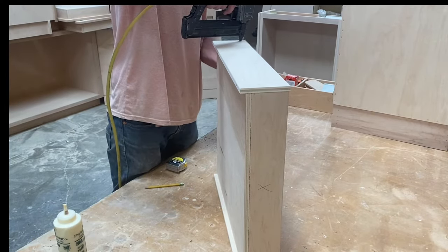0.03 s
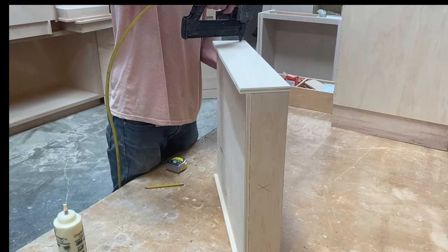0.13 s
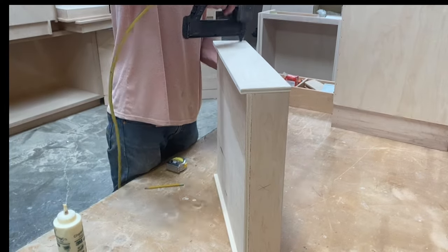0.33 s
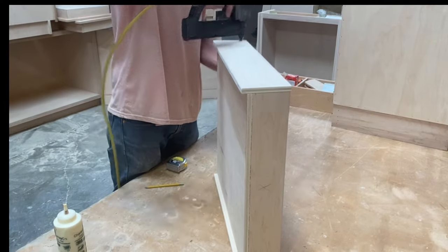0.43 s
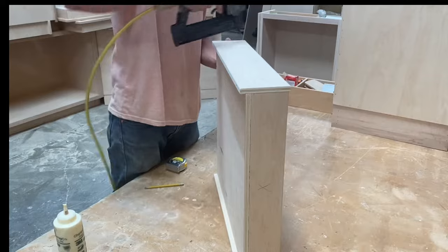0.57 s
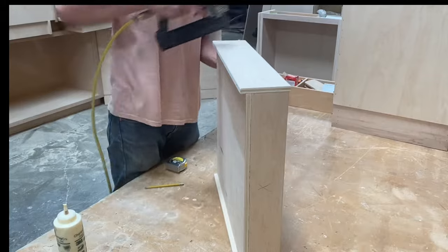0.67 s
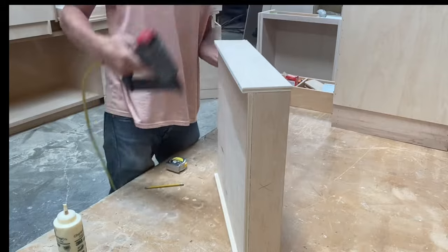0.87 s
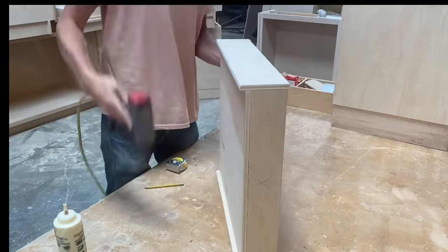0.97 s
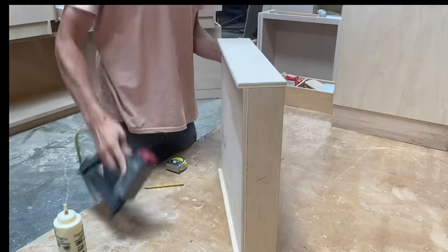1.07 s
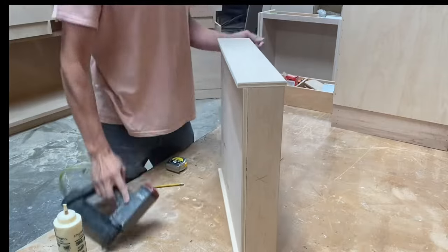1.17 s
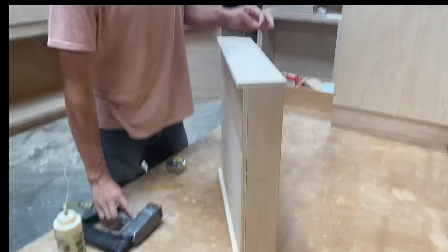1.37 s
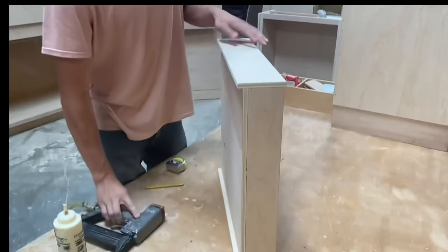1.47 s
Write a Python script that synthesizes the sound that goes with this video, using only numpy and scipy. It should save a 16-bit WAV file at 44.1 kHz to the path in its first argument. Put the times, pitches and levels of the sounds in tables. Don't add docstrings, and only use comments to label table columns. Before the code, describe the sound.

A single sharp nail gun shot with a snappy burst of compressed air, close and slightly squashed by a phone microphone, echoes through the shop; a hose softly brushes the bench and the tool lands with quiet knocks.

```python
import sys
import numpy as np
from scipy import signal
from scipy.fft import rfft, irfft
from scipy.io import wavfile
from scipy.ndimage import uniform_filter1d

SR = 44100
rng = np.random.default_rng(int(sys.argv[2]) if len(sys.argv) > 2 else 0)


def bounce(signal):
    frames = np.transpose(np.atleast_2d(signal))
    limited = np.clip(frames, -1, 1)
    pcm = np.round(limited * 32767).astype(np.int16)
    wavfile.write(sys.argv[1], SR, pcm)


def volts_from_db(level):
    exponent = np.asarray(level, float) / 20
    return 10 ** exponent


N = 66150

# t/s, rise/s, hold/s, t60/s, level/dB
VALVE_BURST = (.2078, .005, .002, .045, -21)
LEAK_BURST = (.3055, .001, .007, .03, -29)
BLOW_BURST = (.2266, .003, .006, .04, -5.5)
CHAMBER_BURST = (.247, .003, .015, .17, -19)
EXHAUST_BURST = (.3128, .0006, .011, .07, -6.5)
SIGH_BURST = (.321, .005, .007, .08, -14)
PUFF_BURST = (.58, .04, .02, .2, -69)
SETTLE_BURST = (1.375, .01, .08, .6, -59)
REST_BURST = (1.305, .006, .045, .15, -57)
NEAR_BURST = (1.21, .02, .015, .05, -70)

# f/Hz, density/dB per Hz
VALVE_SPECTRUM = [(200, -26), (1000, -15), (2000, -9), (2900, 0), (4300, -4), (6200, -12), (10900, -6),
                  (16000, -14)]
BLOW_SPECTRUM = [(100, -32), (200, -19), (1100, -13), (1900, -11), (2800, -3), (3900, -2), (5500, -7),
                 (16000, -20)]
CHAMBER_SPECTRUM = [(150, -20), (300, -12), (2300, -13), (3600, -5), (5000, -4), (7000, -5), (7800, -12),
                    (16000, -32)]
EXHAUST_SPECTRUM = [(200, -36), (400, -30), (1100, -21), (3200, -14), (4400, -12), (5700, -5), (10700, -6),
                    (16000, -19)]
SIGH_SPECTRUM = [(300, -22), (1500, -15), (2900, -10), (4100, -7), (5300, -7), (6500, -5), (10000, -12),
                 (16000, -28)]
PUFF_SPECTRUM = [(1000, -30), (4000, -6), (8000, 0), (12000, -3), (16000, -12)]
SETTLE_SPECTRUM = [(200, -14), (900, -5), (1410, 0), (1840, -2), (2600, -13), (4450, -10), (6500, -13),
                   (9000, -32)]
REST_SPECTRUM = [(300, -14), (1200, -5), (2500, -6), (4500, -4), (6500, -6), (8000, -20), (16000, -40)]
SWISH_SPECTRUM = [(120, -38), (200, -8), (450, -10), (1560, -4), (3400, -9), (6000, -12), (10700, -15),
                  (16000, -36)]
SHOP_SPECTRUM = [(50, -14), (100, -4), (150, -9), (400, -15), (1100, -18), (2000, -26), (4000, -33),
                 (16000, -45)]
SWAY_SPECTRUM = [(2, -6), (6, 0), (18, 0), (28, -14), (45, -50), (200, -120)]
RUMBLE_SPECTRUM = [(15, -40), (28, 0), (50, -2), (68, -14), (90, -45), (300, -120)]

# f/Hz, width/Hz, level/dB
HOUSING_PEAKS = [(2800, 120, -5), (3920, 160, 0), (5370, 450, -5), (6830, 120, -6), (7550, 99, -10),
                 (9720, 130, -10), (11600, 130, -14)]
CAP_PEAKS = [(5800, 120, -2), (7420, 60, -8), (8240, 110, -2), (10600, 120, 0), (12000, 60, -10),
             (13700, 100, -12)]
CYLINDER_PEAKS = [(2880, 60, -6), (3950, 60, -2), (5300, 90, -5), (6450, 70, 0)]
HOSE_PEAKS = [(1600, 180, 0), (2300, 200, -9), (3050, 160, -3), (3680, 160, -4)]

# f/Hz, level/dB, t60/s
BOX_MODES = [(50, -10, .4), (104, -12, .3), (185, -6, .12), (245, -1, .1), (425, 3, .06), (720, 3, .08),
             (1125, 10, .08), (1384, -3, .085), (1707, 1, .1), (2062, 4, .07)]
TOOL_MODES = [(750, -7, .025), (1310, -1, .035), (1890, 1, .03), (2540, -2, .028), (3670, -7, .025),
              (4430, -6, .025), (5140, -4, .025), (6300, -3, .022)]

# t/s, length/s, f/Hz, level/dB, glide/share of f
WHISTLES = [
    (.2285, .007, 2800, -12, -.03),
    (.229, .008, 5400, -15, 0.01),
    (.233, .009, 3900, -13, .02),
    (.2525, .014, 3700, -27, .02),
    (.313, .009, 5800, -14, -.02),
    (.316, .012, 10600, -14, -.01),
    (.317, .012, 8300, -15, -.02),
    (.323, .013, 5350, -8, -.02),
    (.327, .012, 3950, -19, .01),
    (.352, .014, 6300, -24, .02),
]
# t/s, f/Hz, level/dB, t60/s
THUMPS = [(0, 45, -44, .15), (.305, 180, -20, .06), (.28, 50, -30, .3), (.35, 100, -32, .3),
          (.262, 105, -30, .15), (.4, 105, -43, .3), (.39, 200, -40, .08), (.42, 48, -36, .25),
          (.62, 40, -46, .15), (.68, 45, -40, .15), (.69, 190, -58, .1), (1.09, 60, -46, .12),
          (1.09, 105, -56, .2), (1.295, 250, -36, .12), (1.284, 400, -37, .05), (1.31, 120, -38, .2),
          (1.365, 420, -42, .04), (1.38, 250, -44, .16), (1.4987, 560, -10, .006), (1.3645, 700, -28, .012),
          (1.37, 60, -39, .3), (1.41, 122, -44, .15)]
# t/s, level/dB, centre f/Hz, t60/s, spread/octaves
KNOCKS = [(.251, -16, 6000, .012, .8), (.5025, -48, 11000, .02, .4), (.5065, -42, 13000, .03, .5),
          (.517, -54, 11000, .03, .15), (.766, -59, 7500, .014, .45), (1.2493, -38, 3000, .02, .7),
          (1.2525, -46, 8000, .035, .8), (1.259, -51, 2800, .06, .8), (1.2845, -37, 1200, .035, 1.0),
          (1.2882, -36, 4500, .03, .7), (1.2935, -36.5, 4000, .025, 1.4), (1.3035, -37.5, 3500, .025, 1.1),
          (1.365, -36, 1100, .03, 1.2), (1.3664, -26, 5800, .02, .85), (1.381, -46, 1500, .08, .9),
          (1.432, -50, 2500, .05, 1.1), (1.4988, -32, 2500, .02, 1.2), (1.4987, -27, 5700, .02, .3)]
# t/s, level/dB
TOOL_HITS = [
    (1.2493, -54),
    (1.259, -58),
    (1.2882, -49),
    (1.2935, -49),
    (1.3035, -50),
    (1.3666, -37),
    (1.369, -45),
    (1.395, -58),
    (1.401, -56),
    (1.4988, -36),
]
# f/Hz, t60/s, level/dB
SHOP_REVERB = [(130, .65, 0), (350, .8, 6), (700, .75, 1), (1300, .8, 2), (3500, .74, -2.5),
               (6000, .52, 0.5), (9000, .36, -2.5), (16000, .17, 0)]
# t/s, level/dB
SWISH_LEVEL = [(0, -63), (.05, -85), (.56, -85), (.63, -66), (.72, -74), (.82, -70), (.89, -63),
               (1.07, -63), (1.14, -70), (1.2, -72), (1.24, -70), (1.4, -61), (1.5, -65)]
# t/s, sway level/dB, rumble level/dB
RUMBLE_LEVEL = [(0.0, -54, -48), (0.05, -61, -57), (0.188, -56, -62), (0.216, -44, -52), (0.296, -45, -39),
                (0.408, -52, -44), (0.434, -46, -40), (0.492, -50, -57), (0.71, -52, -47),
                (0.772, -47, -61), (0.83, -45, -56), (0.898, -47, -69), (1.022, -61, -52),
                (1.168, -43, -56), (1.382, -44, -46), (1.5, -48, -54)]


def evened(x):
    return x / np.sqrt(np.mean(x ** 2) + 1e-20)


def read(points, hz, column=1):
    table = np.transpose(points)
    return np.interp(np.log(hz + 1), np.log(table[0] + 1), table[column])


def add(mix, start_s, sound):
    part = mix[round(start_s * SR):][:len(sound)]
    part += sound[:len(part)]


def noise(spectrum, size):
    gain = volts_from_db(read(spectrum, np.fft.rfftfreq(size, 1 / SR)))
    return evened(irfft(rfft(rng.standard_normal(size)) * gain, size))


def resonate(x, hz, width_hz):
    turn = np.exp(2j * np.pi * hz * np.arange(len(x)) / SR)
    pole = np.exp(-np.pi * width_hz / SR)
    return 2 * (turn * signal.lfilter([1 - pole], [1, -pole], x / turn)).real


def burst(row, spectrum, peaks=(), peaks_db=0):
    start_s, rise_s, hold_s, t60_s, level_db = row
    t = np.arange(16384) / SR
    decay = volts_from_db(-60 * np.maximum(t - rise_s - hold_s, 0) / t60_s)
    shape = np.minimum(t / rise_s, 1) ** 2 * decay
    grit_db = 1.8 * evened(uniform_filter1d(rng.standard_normal(len(t)), size=60))
    air = noise(spectrum, len(t))
    white = rng.standard_normal(len(t))
    if len(peaks):
        ringing = sum(volts_from_db(db) * evened(resonate(white, hz, 2.5 * width)) for hz, width, db in peaks)
        air = air + volts_from_db(peaks_db) * evened(ringing)
    return start_s, volts_from_db(level_db) * shape * volts_from_db(grit_db) * air


def ring(hz, level_db, t60_s):
    t = np.arange(0, .6, 1 / SR)
    soft_start = np.minimum(t * hz / .7, 1)
    return volts_from_db(level_db - 60 * t / t60_s) * np.sin(2 * np.pi * hz * t) * soft_start


def nailer():
    out = np.zeros(N)
    add(out, *burst(VALVE_BURST, VALVE_SPECTRUM))
    add(out, *burst(BLOW_BURST, BLOW_SPECTRUM, HOUSING_PEAKS, peaks_db=-6))
    add(out, *burst(CHAMBER_BURST, CHAMBER_SPECTRUM))
    add(out, *burst(EXHAUST_BURST, EXHAUST_SPECTRUM, CAP_PEAKS, peaks_db=-7))
    add(out, *burst(SIGH_BURST, SIGH_SPECTRUM, CYLINDER_PEAKS, peaks_db=-6))
    add(out, *burst(LEAK_BURST, EXHAUST_SPECTRUM))
    add(out, *burst(PUFF_BURST, PUFF_SPECTRUM))
    box = sum(ring(*mode) for mode in BOX_MODES)
    add(out, BLOW_BURST[0] + .0004, volts_from_db(-25) * box)
    return out


def whistles():
    out = np.zeros(N)
    draws = rng.standard_normal((len(WHISTLES), 1024))
    for (start_s, length_s, hz, level_db, glide), z in zip(WHISTLES, draws):
        u = np.arange(0, length_s, 1 / SR) / length_s
        waver = .02 * evened(uniform_filter1d(z, size=40))[:len(u)]
        pitch_hz = hz * (1 + glide * (u - .5) + waver)
        tone = np.sin(2 * np.pi * np.cumsum(pitch_hz) / SR)
        add(out, start_s, volts_from_db(level_db) * np.sin(np.pi * u) * tone)
    return out


def thumps():
    out = np.zeros(N)
    for start_s, *mode in THUMPS:
        add(out, start_s, ring(*mode))
    return out


def knocks():
    out = np.zeros(N)
    size = 4096
    t = np.arange(size) / SR
    hz = np.fft.rfftfreq(size, 1 / SR) + 1
    draws = rng.standard_normal((len(KNOCKS), size))
    for (start_s, level_db, centre_hz, t60_s, spread_oct), z in zip(KNOCKS, draws):
        bell = np.exp(-(np.log2(hz / centre_hz) / spread_oct) ** 2 / 2) / np.sqrt(hz)
        crackle = evened(irfft(rfft(z) * bell, size))
        add(out, start_s, crackle * np.minimum(t / .0003, 1) * volts_from_db(level_db - 60 * t / t60_s))
    return out


def clacks():
    out = np.zeros(N)
    draws = rng.standard_normal((len(TOOL_HITS), len(TOOL_MODES)))
    for (start_s, hit_db), z in zip(TOOL_HITS, draws):
        clack = 0
        for (hz, db, t60_s), v in zip(TOOL_MODES, z):
            clack = clack + np.sign(v) * ring(hz * (1 + .015 * v), hit_db + db + 2.5 * v, t60_s)
        add(out, start_s, clack)
    add(out, *burst(SETTLE_BURST, SETTLE_SPECTRUM))
    add(out, *burst(REST_BURST, REST_SPECTRUM))
    add(out, *burst(NEAR_BURST, PUFF_SPECTRUM))
    return out


def shop(x):
    taps = np.zeros(SR + SR // 4)
    at = np.arange(0, len(taps) - 20, 20)
    taps[at + rng.integers(0, 20, len(at))] = rng.choice([-1., 1.], len(at))
    first_echo_s = .012
    taps[:round(first_echo_s * SR)] = 0
    hz, t, z = signal.stft(taps, SR, nperseg=256)
    t60_s = read(SHOP_REVERB, hz)[:, None]
    level_db = read(SHOP_REVERB, hz, column=2)[:, None]
    tail = signal.istft(z * volts_from_db(level_db - 60 * t / t60_s), SR, nperseg=256)[1]
    return signal.fftconvolve(x, tail / np.linalg.norm(tail))[:N]


def hose():
    t = np.arange(N) / SR
    flicker = volts_from_db(evened(uniform_filter1d(rng.standard_normal(N), size=500)))
    white = rng.standard_normal(N)
    ridges = evened(sum(volts_from_db(db) * resonate(white, hz, width) for hz, width, db in HOSE_PEAKS))
    level = volts_from_db(np.interp(t, *np.transpose(SWISH_LEVEL)))
    return (noise(SWISH_SPECTRUM, N) + volts_from_db(-1.5) * ridges) * flicker * level


def rumble():
    t = np.arange(N) / SR
    s, sway_db, rumble_db = np.transpose(RUMBLE_LEVEL)
    sway = noise(SWAY_SPECTRUM, N) * volts_from_db(np.interp(t, s, sway_db))
    return sway + noise(RUMBLE_SPECTRUM, N) * volts_from_db(np.interp(t, s, rumble_db) - 2.5)


def shop_air():
    return volts_from_db(-70) * noise(SHOP_SPECTRUM, N)


def scene():
    gun = nailer()
    tones = whistles()
    small = knocks() + clacks()
    low = thumps()
    wet = shop(volts_from_db(-16.5) * gun + volts_from_db(-21) * tones + volts_from_db(-15) * small + volts_from_db(-20) * low)
    mix = gun + tones + small + low + wet + hose() + rumble() + shop_air()
    return mix[None]


def top_cut(x):
    return signal.sosfilt(signal.butter(12, 16620, fs=SR, output="sos"), x)


def record(dry):
    ceiling, edge_hz = .68, 15750
    limited = ceiling * np.tanh(dry / ceiling)
    lowpass = signal.firwin(255, edge_hz, window=("kaiser", 9), fs=SR)
    mix = signal.oaconvolve(limited, lowpass[None], "same")
    return top_cut(mix)


dry = scene()
out = record(dry)
bounce(out)
```